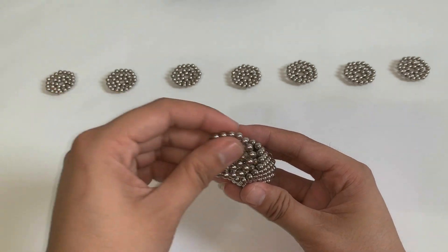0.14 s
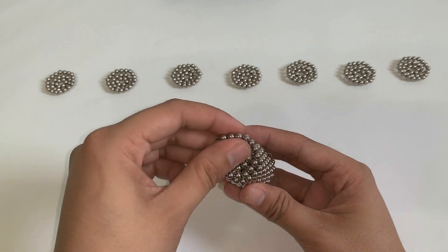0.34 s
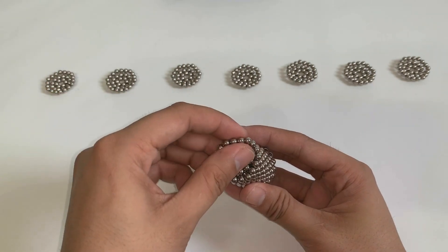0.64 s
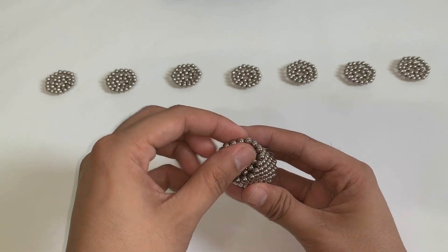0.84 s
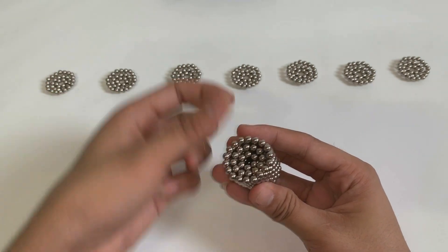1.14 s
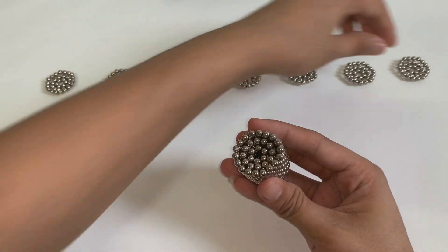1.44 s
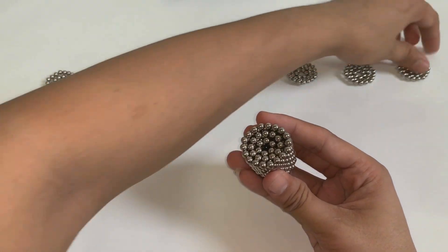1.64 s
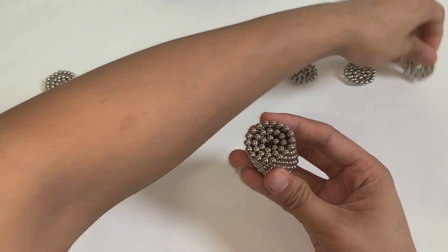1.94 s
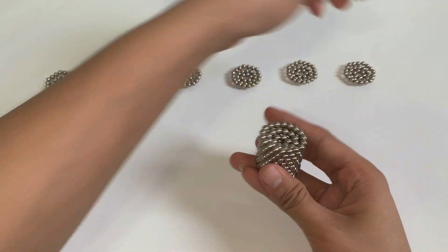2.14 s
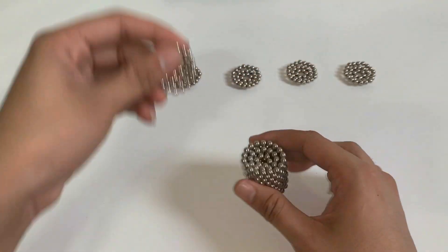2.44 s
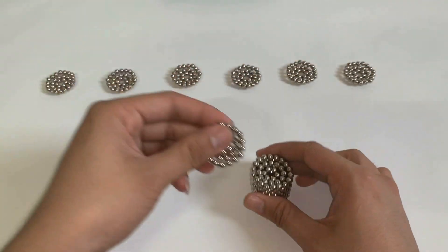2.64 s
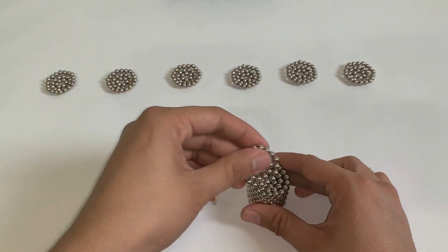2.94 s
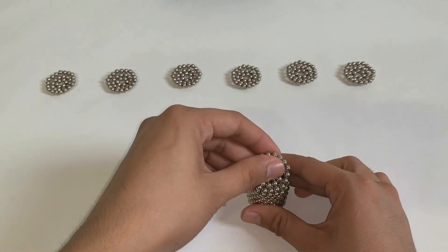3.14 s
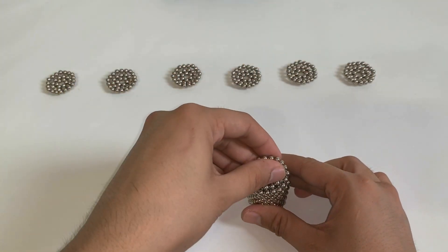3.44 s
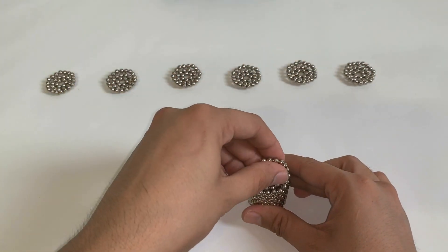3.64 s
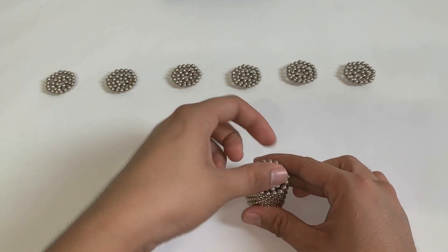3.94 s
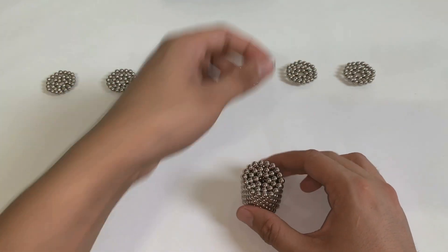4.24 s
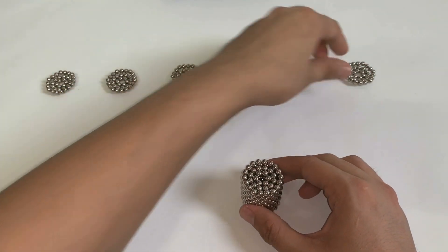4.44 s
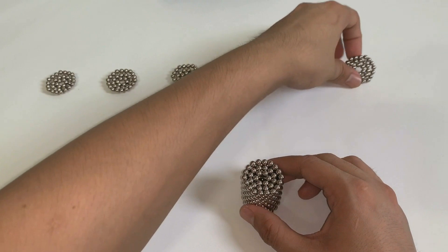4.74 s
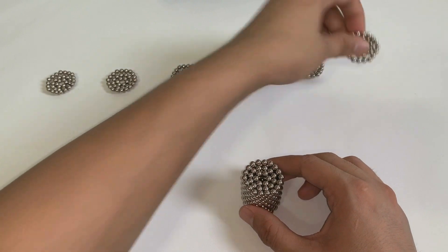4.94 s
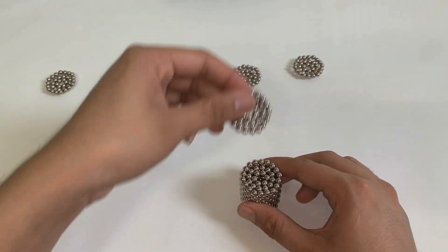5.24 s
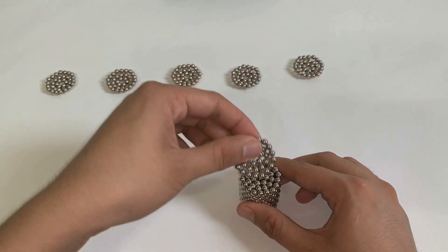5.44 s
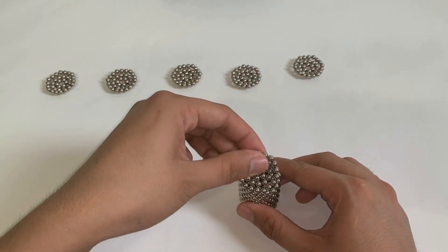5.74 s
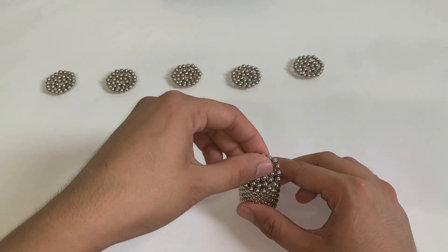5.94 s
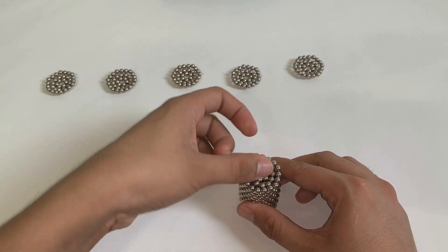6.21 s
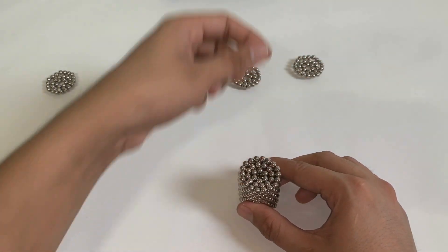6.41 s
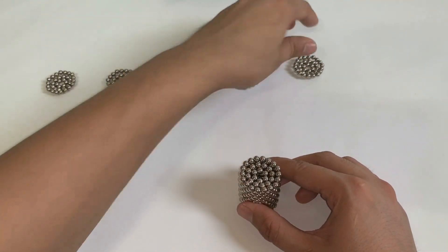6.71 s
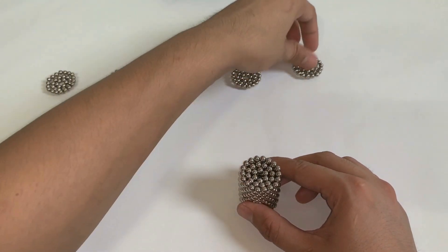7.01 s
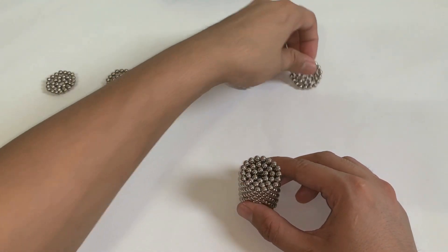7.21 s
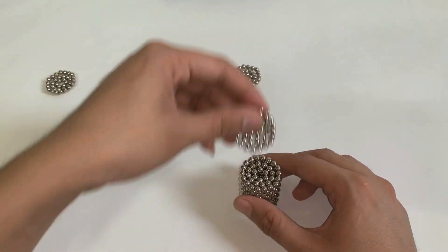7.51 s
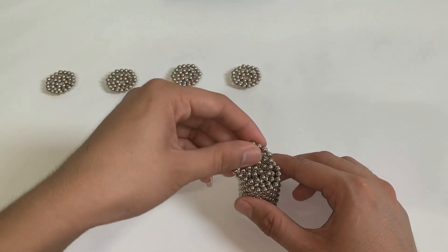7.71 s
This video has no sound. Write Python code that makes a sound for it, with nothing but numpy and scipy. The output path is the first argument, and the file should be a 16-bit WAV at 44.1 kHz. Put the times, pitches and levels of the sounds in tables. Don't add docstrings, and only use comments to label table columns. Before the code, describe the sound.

A close, dry stereo scene in a small quiet room. At about 0.5 s a bright steel click starts scattered ticks, building to tight zipping clusters at 1.0 and 1.1 s as magnetic balls pull together. From 1.5 s soft low bumps lead into short gritty finger scrapes and taps from 1.7 to 2.05 s, with a very faint high squeak near the end. At 2.75 s the stack hits the table: a hard, hollow woody knock with brief ringing. Snaps resume at 3.4 s, small ticks follow, and a very sharp loud burst lands at 3.99 s. Dull bumps, taps and drags fill 4.1 to 4.9 s. More clicks at 5.8 s grow into crackling runs from 6.05 to 6.35 s. Stuttering scrapes follow from 6.9 to 7.3 s, then a modest last snap at 7.8 s. Faint rumble, hum and hiss continue throughout.

```python
import sys
import numpy as np
from scipy import signal
from scipy.fft import rfft, irfft, next_fast_len
from scipy.io import wavfile
from scipy.ndimage import uniform_filter1d, map_coordinates

SR = 44100
rng = np.random.default_rng(int(sys.argv[2]) if len(sys.argv) > 2 else 0)


def wav_record(signal):
    frames = np.transpose(np.atleast_2d(signal))
    bounded = np.clip(frames, -1, 1)
    quanta = np.round(bounded * 32767).astype(np.int16)
    wavfile.write(sys.argv[1], SR, quanta)


def convert_level_to_amplitude(level_db):
    exponent = np.asarray(level_db, float) / 20
    return 10 ** exponent


N = 347067

# time in seconds, level in dB.
KNOCK = (2.7503, -20)
# centre in Hz, width in Hz, level in dB.
PANEL = [(241, 121, -7), (393, 100, 3), (577, 120, -1), (690, 91, -4), (1280, 210, -17)]
# frequency in Hz, left-right likeness from 0 to 1.
ALIKE = [(60, 0.94), (300, .8), (640, 0.47), (1400, 0), (4000, 0)]


def unit(x):
    return x / np.sqrt(np.mean(x ** 2) + 1e-20)


def along(points, hz):
    f, v = np.transpose(points)
    return np.interp(np.log(hz + 1), np.log(f + 1), v)


def curves(rows):
    s, *cols = np.transpose(rows)
    return [np.interp(np.arange(N) / SR, s, c) for c in cols]


def wobble(rate):
    return map_coordinates(rng.standard_normal(int(N * rate / SR) + 4), [np.arange(N) * rate / SR])


def filtered(x, response):
    m = next_fast_len(N + SR // 2)
    return irfft(rfft(x, m) * response(np.fft.rfftfreq(m, 1 / SR)), m)[..., :N]


def modes(table):
    def response(f):
        total = 0
        for k, (centre, width, db) in enumerate(table):
            damping = 1j * f * width
            total = total + (-1) ** k * convert_level_to_amplitude(db) * damping / (centre * centre - f * f + damping)
        return total
    return response


def dull(hz):
    return 1 / (1 + 1j * hz / 2200) ** 2


def add(track, s, sound):
    part = track[round(s * SR):][:len(sound)]
    part += sound[:len(part)]


def swing(db, hz, length, rise):
    u = np.arange(round(5 * length * SR)) / SR / length
    swell = (1 - np.exp(-u / rise)) ** 2 * np.exp(-1.6 * u)
    return convert_level_to_amplitude(db) * swell / swell.max() * np.sin(2 * np.pi * hz * length * u)


def struck(push, table, stretch):
    sound = irfft(rfft(push, 2048) * modes(table)(np.fft.rfftfreq(2048, 1 / SR) * stretch), 2048)
    return sound / np.linalg.norm(sound)


def contacts():
    # time in seconds, peak in dB, stack body in dB re peak.
    held = [(0.4802, -24.5, -21), (.622, -39, -19.5), (0.677, -34, -28), (0.689, -34.5, -17.5),
            (.864, -30, -24), (0.8747, -30, -20.5), (0.908, -30, -16.5), (0.9214, -48, -8),
            (0.989, -26.5, -20), (1.002, -25, -21), (1.0079, -24, -16.5), (1.1084, -22.5, -22),
            (1.1153, -18.5, -27.5), (1.1166, -25, -12.5), (2.049, -48, -22)]
    # time in seconds, peak in dB, stack body and table
    # in dB re peak.
    standing_snaps = [(3.398, -27.5, -16, -29), (3.4008, -23.5, -26.5, -26.5), (3.414, -37, -28, -25),
                      (3.4647, -35.5, -21, -30), (3.5282, -36.5, -26, -40), (3.5888, -39, -9.5, -10.5),
                      (3.6623, -40, -23, -28), (3.7521, -43.5, -6, -16), (3.72, -60, -17, -31),
                      (3.7571, -31.5, -13, -20), (3.918, -34.5, -13, -15), (3.9418, -37.5, -14, -10.5),
                      (3.9648, -37.5, -12.5, -12), (3.9747, -28.5, -22.5, -22.5), (3.983, -23.5, -16, -17),
                      (3.9883, -17.5, -12.5, -36), (3.9914, -12, -16.5, -21.5), (4.19, -58, -11, -18),
                      (5.8109, -21.5, -25.5, -25.5), (5.811, -31.5, -9, -46), (5.917, -44, -14, -25),
                   (5.92, -38.5, -14, -26), (6.0465, -34.5, -18, -40), (6.0538, -31, -19, -27),
                   (6.161, -37.5, -11, -23), (6.1763, -30, -20, -17), (6.2388, -34, -13, -9.5),
                   (6.2591, -37, -2, -5), (6.3182, -27.5, -13, -21), (6.3278, -23, -24, -28),
                   (6.3302, -23.5, -27, -28), (6.343, -25.5, -23, -36), (6.3455, -40.5, 2.5, -0.5),
                   (7.368, -53.5, -18, -29), (7.7853, -28, -20, -30.5), (7.7893, -33, -8.5, -14.5),
                   (6.147, -62, -30, -33)]
    # time in seconds, peak in dB, stack body
    # and table in dB re peak.
    further_snaps = [(.9692, -34, -15, -44.5), (0.9904, -30, -16.5, -45.5), (.9925, -43, -24, -45),
                     (1.004, -31, -15, -45), (1.0105, -45, -27, -45), (1.1005, -46, -16, -44),
                     (1.1105, -22, -23, -44.5), (1.113, -25, -16, -45), (1.1169, -19.5, -21, -31),
                     (1.121, -43, -15, -45), (1.124, -39.5, -18, -45.5), (3.9316, -45, -3, -9),
                     (3.995, -38, 7, -25), (3.999, -40, -7.5, -16.5), (5.8104, -30.5, -16, -23),
                     (3.9897, -12, -13.5, -35), (3.9904, -21.5, -14, -29.5), (6.1837, -35, -11, -25),
                     (6.187, -27.5, -12, -19), (6.1866, -37, -18, -22), (6.188, -40, -18, -28),
                     (6.1958, -31.5, -11, -26), (6.3325, -31.5, -22, -17.5), (6.3345, -24, -20, -27),
                     (0.8679, -49, -15, -45), (0.8784, -43, -18, -45), (.9105, -40.5, -15.5, -45.5),
                     (6.2637, -37, -1, -12), (3.9669, -45, -10, -11)]
    # start in seconds, length in seconds, first and last level in dB.
    zips = [(0.476, 0.0089, -36, -28), (0.9645, 0.002, -43.5, -41.5), (0.984, 0.011, -50, -49),
            (1.008, 0.0029, -48, -31), (1.103, 0.012, -43, -46), (3.926, 0.01, -35, -46.5),
            (3.979, 0.016, -40, -23), (6.158, 0.009, -47, -43), (6.192, .0075, -26, -28),
            (6.206, 0.013, -60, -31), (6.252, 0.0099, -44, -32.5), (6.326, 0.011, -30.5, -29)]
    zip_gap_s, zip_scatter_db, zip_body_db = 0.0026, 1.5, -11.5
    held_pass_db, zip_pass_db = -43.5, -14
    rows = [(*row, held_pass_db) for row in held] + standing_snaps
    for start, length, first_db, last_db in zips:
        gap, size = rng.standard_normal((2, 9))
        after = zip_gap_s * np.cumsum(np.exp(0.31 * gap))
        after = after - after[0]
        db = first_db + (last_db - first_db) * after / length + zip_scatter_db * size
        db[after > length] = -np.inf
        passed_db = held_pass_db if start < KNOCK[0] else zip_pass_db
        rows += [(start + a, d, zip_body_db, passed_db) for a, d in zip(after, db)]
    return rows + further_snaps


def balls():
    # centre in Hz, width in Hz, level in dB.
    steel_modes = [(9790, 2090, 6.5), (12770, 2130, 9.5), (15380, 380, -6.5)]
    # centre in Hz, width in Hz, level in dB.
    cluster_modes = [(2052, 1300, -20.5), (2700, 1100, -8.5), (3980, 1400, -2.5), (5800, 950, -0.5)]
    # centre in Hz, width in Hz, level in dB.
    top_modes = [(252, 120, -4), (500, 120, -1), (935, 340, -6), (1500, 460, -7)]
    rattle_s, rattle_spread = 0.0016, 0.47
    tick, body, down = np.zeros((3, N))
    t = np.arange(900) / SR
    for s, db, body_db, table_db in contacts():
        chance = rng.standard_normal((5, len(t)))
        if np.isinf(db):
            continue
        length = rattle_s * np.exp(rattle_spread * chance[4, 2])
        u = t / max(length - 0.0005, 0.0002)
        impact = (1 - np.exp(-t / 0.0001)) * np.exp(-(1.3 * u) ** 0.94)
        shape = impact + convert_level_to_amplitude(-9.5) * np.exp(-u / 2.6)
        size = convert_level_to_amplitude(db) * np.sqrt(length * SR)
        stretch = np.exp(0.0045 * chance[4, :2])
        rough = shape * chance[0] * convert_level_to_amplitude(1.0 * chance[1])
        add(tick, s, size * convert_level_to_amplitude(-5.5) * struck(rough, steel_modes, stretch[0]))
        add(body, s, size * convert_level_to_amplitude(body_db - 5.5) * struck(shape * chance[2], cluster_modes, stretch[1] ** 3))
        add(down, s, size * convert_level_to_amplitude(table_db - 8.0) * struck(shape * chance[3], top_modes, stretch[1]))
    steep = lambda f: 1j * f / (1j * f + 1500)
    return filtered(tick + body, steep), down


def rings():
    # time in seconds, peak in dB, frequency in Hz.
    ring_rows = [(0.48, -37, 6560), (0.6764, -65, 5050), (0.6895, -56, 6400), (0.8642, -48.5, 6600),
                 (0.8737, -50, 7460), (0.9078, -44, 6670), (0.9694, -49, 6800), (0.9888, -45, 7100),
                 (1.0036, -41, 7600), (1.0039, -37.5, 6540), (1.007, -37, 6600), (1.1076, -33.5, 6240),
                 (1.1154, -33.5, 6270), (3.3984, -46, 4340), (3.4006, -40, 4720), (3.466, -45.5, 6540),
                 (3.5284, -59, 7180), (3.588, -52, 4400), (3.7573, -42.5, 5500), (3.918, -48.5, 4900),
                 (3.9234, -45.5, 4930), (3.9425, -49.5, 4430), (3.9652, -50.5, 4860), (3.9744, -45, 3470),
                 (3.9828, -32, 6400), (3.9891, -19, 5800), (3.992, -19.5, 5470), (5.8107, -39.5, 5600),
                 (5.917, -51, 4800), (6.0454, -56, 5230), (6.054, -50, 2670), (6.1601, -44, 7430),
                 (6.1768, -34.5, 8150), (6.1946, -36.5, 3800), (6.2377, -54, 5090), (6.2575, -42, 2570),
                 (6.318, -55, 5900), (6.328, -41, 7060), (6.3418, -34, 4520), (7.7877, -46.5, 4500),
                 (3.402, -56, 2630), (3.404, -56.5, 1500), (3.5905, -54.5, 1500), (3.592, -55, 2700),
                 (3.759, -58, 2500), (3.7535, -48, 4700), (5.8125, -54.5, 2400), (5.813, -60, 1400),
                 (7.79, -54, 2300), (.481, -52, 3400), (.678, -56, 3540), (1.118, -53, 3600)]
    ring_s, ring_db = 0.0015, -3
    out = np.zeros(N)
    for s, db, hz in ring_rows:
        add(out, s, swing(db + ring_db, hz, ring_s * convert_level_to_amplitude(0.15 * (db + 44.5)), rise=0.11))
    return out


def knock():
    # frequency in Hz, level in dB, 60 dB decay time in seconds.
    board_modes = [(103, -15, 0.53), (222, 0.5, 0.13), (293, -6, 0.078), (380, -1, 0.078),
                   (477, 3.5, 0.064), (509.6, -3, 0.12), (690, -22, 0.22), (738, -18.5, 0.13),
                   (1010, -21, 0.075), (3920, -39.5, .08), (2200, -25, .07), (1376, -29.5, 0.061),
                   (1810, -25, 0.075), (248, 0, 0.052)]
    # centre in Hz, width in Hz, level in dB.
    heel = [(426, 390, 6.5), (1500, 1800, -5.5), (2300, 1200, -17.5), (3930, 590, -18.0)]
    s, size = KNOCK[0], convert_level_to_amplitude(KNOCK[1])
    touch_s = s - 0.002
    t = np.arange(SR) / SR
    ring = sum(convert_level_to_amplitude(db - 60 * t / t60) * np.sin(2 * np.pi * hz * t) for hz, db, t60 in board_modes)
    crack = convert_level_to_amplitude(2.5 - 60 * t / 0.034) * rng.standard_normal(SR)
    jingle = convert_level_to_amplitude(-28.5 - 60 * t / 0.031) * rng.standard_normal(SR)
    out, puff = np.zeros((2, N))
    add(out, s, size * convert_level_to_amplitude(-7) * ring * (1 - np.exp(-(t / 0.0018) ** 2)))
    add(out, touch_s, size * jingle)
    add(puff, touch_s, size * crack * (1 - np.exp(-t / 0.0014)))
    return out + filtered(puff, modes(heel))


def drags():
    # start in seconds, hold in seconds, scrape in dB, grit in dB re scrape, panel in Hz.
    strokes = [(1.701, 0.025, -49, -33, 1090), (1.759, 0.05, -52, -16, 1170),
               (1.821, 0.044, -50, -25, 1090), (1.866, 0.052, -50, -26, 1250),
               (1.928, 0.052, -54, -15.5, 1190), (1.969, 0.011, -46.5, -24, 1110),
               (4.172, 0.043, -68, -13.5, 750), (4.575, 0.089, -52.5, -23.5, 760),
               (4.655, 0.022, -53, -21.5, 880), (4.82, 0.028, -52, -16, 785), (4.867, 0.0042, -66, -8, 850),
               (6.866, 0.023, -62.5, -21.5, 650), (6.982, 0.045, -55, -21, 580),
               (7.093, 0.019, -42.5, -15.5, 770), (7.088, 0.011, -50, -27.5, 690),
               (7.132, 0.068, -51, -18.5, 820), (7.208, 0.022, -47.5, -25.5, 800),
               (7.256, 0.015, -50.5, -11.5, 690)]
    # frequency in Hz, density in dB per Hz.
    grit_spectrum = [(1180, -27), (2000, -6.5), (3840, -6.5), (4260, -3.5), (6820, -17.5), (9250, -20),
                     (11400, -32), (13200, -22), (16000, -46)]
    grip_s, lift_db_per_s = 0.0099, 611
    t = np.arange(SR // 2) / SR
    power = np.zeros(N)
    for s, hold, db, *_ in strokes:
        catch = np.clip(t / grip_s, 0, 1) ** 2
        let_go_db = lift_db_per_s * np.clip(t - grip_s - hold, 0, None)
        add(power, s, (catch * convert_level_to_amplitude(db - let_go_db)) ** 2)
    pressure = np.sqrt(power)
    grit_db, panel_hz = curves([(s + grip_s + hold / 2, *rest) for s, hold, _, *rest in sorted(strokes)])
    grains = rng.standard_normal(N) * convert_level_to_amplitude(2 * wobble(90) + 3 * wobble(500))
    centres = np.array([698, 820, 1095, 1305])
    weights = np.exp(-(np.log(panel_hz / centres[:, None]) / 0.26) ** 2)
    weights /= np.linalg.norm(weights, axis=0) + 1e-9
    bodies = [PANEL] + [[(hz, 90, 0)] for hz in centres]
    still, *lines = filtered(grains, lambda f: np.array([modes(body)(f) * dull(f) for body in bodies]))
    moving = sum(w * unit(line) for w, line in zip(weights, lines))
    scrape = unit(still) + moving * convert_level_to_amplitude(1.0)
    clumps = rng.standard_normal(N) * convert_level_to_amplitude(2 * wobble(60) + 4 * wobble(900))
    grit = filtered(clumps, lambda hz: convert_level_to_amplitude(along(grit_spectrum, hz)))
    return pressure * (unit(scrape) + convert_level_to_amplitude(grit_db) * unit(grit))


def catches():
    # time in seconds, peak in dB,
    # frequency in Hz, length in seconds.
    catch_rows = [(1.733, -43, 1300, 0.00094), (2.048, -53.5, 8370, 0.0021), (1.7642, -52, 2592, .0015),
                  (1.791, -41, 2200, 0.0013), (1.796, -51, 4120, 0.002), (1.801, -43.5, 2510, 0.0023),
                  (1.8914, -49, 1900, 0.0013), (1.989, -49.5, 2500, 0.0018), (1.999, -48, 1160, 0.0042),
                  (1.872, -54, 1280, 0.0052), (4.5925, -57.5, 3200, 0.0016), (4.594, -48.5, 1430, 0.0044),
                  (4.668, -60.5, 1890, 0.005), (4.821, -50.5, 3920, .002), (4.877, -40.5, 3920, 0.0018),
                  (4.879, -39.5, 1270, 0.0035), (7.112, -54.5, 3300, 0.0022), (7.118, -51, 3460, 0.0034),
                  (7.113, -53.5, 2200, .002), (7.15, -62, 3100, .002), (7.2202, -48, 1500, 0.0019),
                  (7.221, -56.5, 3100, 0.0044), (7.266, -59, 2200, .0015), (7.267, -55, 3400, .0015),
                  (7.279, -57, 3520, .002), (7.289, -61, 3180, 0.0017), (1.885, -40, 1240, 0.0057),
                  (1.906, -49, 1220, 0.0067), (1.931, -51, 1280, .004), (1.745, -54, 2200, 0.0024),
                  (1.84, -55, 2400, .002), (4.623, -54, 1206, .002), (4.645, -54, 1400, .002),
                  (4.688, -44, 1090, .002)]
    out = np.zeros(N)
    for s, db, hz, length in catch_rows:
        add(out, s, swing(db, hz, length, rise=0.13))
    return out


def taps():
    # time in seconds, peak in dB, frequency in Hz, length in seconds, snap in dB re peak.
    tap_rows = [(1.712, -44, 460, 0.0047, -7), (1.7343, -30, 1920, 0.00075, -6),
                (1.791, -45, 1360, 0.0019, 8.5), (1.7957, -43, 1203, 0.0087, 13.5),
                (1.988, -56, 1130, 0.0025, -5), (4.106, -54, 448.4, 0.004, -10),
                (4.573, -44, 401, 0.0049, -4), (4.592, -36, 736, 0.0027, -4), (4.669, -36, 809, 0.009, -10),
                (4.8206, -32, 698, 0.0019, 4.5), (4.876, -33.5, 817, 0.0033, 6),
                (6.343, -43, 521, 0.0086, 8), (6.882, -43, 454, 0.0027, -15.5),
                (6.976, -50, 500.0, 0.0033, -10)]
    out, snaps, rumble = np.zeros((3, N))
    t = np.arange(6000) / SR
    for s, db, hz, length, snap_db in tap_rows:
        add(out, s, swing(db, hz, length, rise=0.12))
        snap = convert_level_to_amplitude(db + snap_db - 60 * t / 0.021) * (1 - np.exp(-t / 0.0019))
        add(snaps, s, snap * rng.standard_normal(len(t)))
        add(rumble, s, convert_level_to_amplitude(db + snap_db - 5.0 - 60 * t / 0.095) * rng.standard_normal(len(t)))
    board = modes(PANEL + [(933, 190, 0.021)])
    edge = modes([(1920, 890, 3.5), (4320, 590, -14.0), (5800, 7600, -20.0)])
    snaps = filtered(snaps, lambda f: edge(f) / (1 + 1j * f / 6000))
    return out + snaps + filtered(rumble, lambda f: board(f) * dull(f))


def squeak():
    # time in seconds, level in dB.
    whistle_db = [
        (1.9, -79),
        (1.96, -70),
        (2.02, -75.5),
        (2.08, -99),
    ]
    before, after = (whistle_db[0][0] - 0.01, -130), (whistle_db[-1][0] + 0.01, -130)
    level_db, = curves([before, *whistle_db, after])
    band = signal.butter(2, [4350, 4950], "band", fs=SR, output="sos")
    whistle = signal.sosfilt(band, rng.standard_normal(N))
    return convert_level_to_amplitude(level_db + 3 * wobble(80)) * unit(whistle)


def bumps():
    # time in seconds, peak in dB, frequency in Hz.
    thumps = [(1.498, -52, 52), (1.551, -42, 50.48), (1.6364, -43.5, 94.4), (1.6623, -45, 43.5),
              (1.714, -38.5, 59), (1.988, -44.5, 52), (2.277, -49, 48.3), (2.283, -42, 150),
              (3.403, -48, 231), (3.447, -48.5, 65), (3.5906, -53, 222), (3.9322, -52, 134),
              (3.988, -36, 222), (4.015, -43.5, 112.6), (4.0912, -45, 110), (4.1358, -55.5, 106),
              (4.198, -40, 124.6), (4.27, -55, 124), (4.577, -46.5, 249), (4.63, -51.5, 108.5),
              (4.739, -45, 50.4), (5.8149, -49.5, 111), (6.081, -53, 104.4), (6.1815, -45, 124.3),
              (6.263, -50.5, 125.6), (6.327, -46.5, 111.5), (6.88, -51.5, 232), (6.903, -44.5, 49.1),
              (1.797, -52, 135), (7.794, -45, 126.4)]
    # frequency in Hz, length in seconds.
    swing_s = [(50, 0.016), (90, 0.009), (120, 0.041), (150, 0.011), (230, 0.014)]
    out = np.zeros(N)
    for s, db, hz in thumps:
        add(out, s, swing(db, hz, along(swing_s, hz), rise=0.11))
    return out


def ports(x, offsets):
    hz, phase, db = np.transpose(offsets)

    def response(f):
        half = convert_level_to_amplitude(np.interp(f, hz, db) / 2)
        smooth = uniform_filter1d(np.interp(f, hz, phase), size=len(f) // 40, mode="nearest")
        return np.array([half * np.exp(1j * smooth), 1 / half])
    return filtered(x, response)


def room(x):
    # frequency in Hz, 60 dB decay time in seconds.
    decay_s = [(200, 0.32), (700, 0.24), (1400, 0.25), (3700, 0.2), (6000, .25), (10000, 0.22),
               (13500, 0.31), (16000, 0.16)]
    fade_bend = 0.97
    out, hop = np.zeros((2, N + SR)), SR // 2
    for start in range(0, N, hop):
        hz, t, z = signal.stft(rng.standard_normal((2, SR // 2)), SR, nperseg=256)
        fade = convert_level_to_amplitude(-60 * (t / along(decay_s, hz)[:, None]) ** fade_bend)
        tail = signal.istft(z * fade, SR, nperseg=256)[1]
        wet = signal.fftconvolve(x[None, start:start + hop], tail / np.linalg.norm(tail[0]), axes=1)
        out[:, start + 130:start + 130 + wet.shape[1]] += wet

    def share(hz):
        alike = np.clip(along(ALIKE, hz), 0, 1)
        return np.sqrt((1 - alike) / (1 + alike))
    mid = (out[0, :N] + out[1, :N]) / np.sqrt(2)
    side = filtered(out[0, :N] - out[1, :N], share) / np.sqrt(2)
    return np.array([mid + side, mid - side]) / np.sqrt(2)


def rush(spectrum):
    def response(hz):
        turn = np.arccos(np.clip(along(ALIKE, hz), -1, 1)) / 2
        return convert_level_to_amplitude(along(spectrum, hz)) * [np.cos(turn), np.sin(turn)]
    mid, side = filtered(rng.standard_normal((2, N)), response)
    return unit(np.array([mid + side, mid - side]))


def patchy(x, depth_db):
    # centre in seconds, half length in seconds, depth in dB.
    clamps = [(0.335, 0.12, 1.5), (1.348, 0.06, 5), (1.235, 0.027, 5), (2.495, 0.11, 1), (3.292, 0.11, 2.5),
              (4.451, 0.074, 0.5), (5.198, 0.13, 1), (5.866, 0.045, 8), (5.996, .04, 3), (6.617, 0.14, 3),
              (7.553, 0.17, 1.5)]
    clamp_hz, clamp_octaves = 2500, 0.94
    z = signal.stft(x, nperseg=512)[2]
    field = uniform_filter1d(rng.standard_normal(z.shape[1:]), size=2, axis=0)
    field = unit(uniform_filter1d(field, size=19, axis=1))
    hz = np.fft.rfftfreq(512, 1 / SR)[:, None]
    t = np.arange(z.shape[2]) * 256 / SR
    band = np.exp(-(np.log2((hz + 1) / clamp_hz) / clamp_octaves) ** 4)
    wide = np.exp(-(np.log2((hz + 1) / 2800) / 1.1) ** 4)
    clamp_db = band * sum(db * np.exp(-((t - s) / half) ** 4) for s, half, db in clamps)
    dropout = np.clip(3 * (field - 1.6 + 0.5 * wide + 0.2 * clamp_db), 0, 1)
    return signal.istft(z * convert_level_to_amplitude(-clamp_db - depth_db * dropout), nperseg=512)[1][:, :N]


def floor():
    # frequency in Hz, density in dB per Hz.
    low_spectrum = [(12, -45), (20, -17), (54, 1.5), (86, -8), (110, -8.5), (140, -34), (240, -120)]
    hum_spectrum = [(47, -44), (80, -15.5), (124, -2.5), (184, -16), (232, -8), (400, -18), (439, -20),
                    (900, -37.5), (1170, -75), (1980, -120)]
    hiss_spectrum = [(290, -33), (500, -9), (585, -18), (745, -12.5), (1020, -13), (1320, -13.5),
                     (2230, -17.5), (4600, -15.5), (7160, -21), (10100, -21), (11300, -23.5), (13600, -18),
                     (15000, -25.5)]
    # time in seconds, level in dB.
    lean = [(0, -70.5), (1.95, -67), (2.65, -77), (2.94, -65.5), (3.8, -67), (4.12, -60.5), (4.4, -69),
            (4.8, -63.5), (5.15, -72), (6.16, -64.5), (6.88, -69.5), (7.1, -63.5), (7.36, -72), (7.87, -68)]
    lean_db, = curves(lean)
    lean_db = lean_db - lean_db.mean()
    sway_db = -68.5 + 0.89 * lean_db
    hum_db = -70.5 + 1.3 * lean_db
    sway = convert_level_to_amplitude(sway_db + 2.5 * wobble(12)) * rush(low_spectrum)
    hum = convert_level_to_amplitude(hum_db + 1.8 * wobble(7.5)) * rush(hum_spectrum)
    hiss = filtered(rush(hiss_spectrum), lambda hz: hz < 15200)
    return sway + hum + convert_level_to_amplitude(-81.5 + 0.56 * wobble(7.2)) * patchy(hiss, depth_db=14.5)


def scene():
    # frequency in Hz, phase in radians, level in dB.
    hand_offsets = [(0, 0, 0), (1460, -.5, 1.5), (2760, 1.4, 2.5), (5600, 2.1, -4.5), (7500, .9, .5),
                    (16800, -8.9, -.7)]
    table_offsets = [(0, 0.5, 1.5), (150, 0.65, -1), (297.9, 0.5, 0), (988.6, 0.8, 2), (2310, 1, 4.5),
                     (6200, 1, -4.5), (12000, -0.42, -1)]
    # frequency in Hz, level in dB.
    wall_colour = [(2000, 3.5), (4500, 2), (5800, 4), (7500, 5), (10000, -3.5), (12500, -7), (14500, 0),
                   (16000, -2)]
    direct_share = 0.58
    background, soft = floor(), bumps()
    table = taps() + drags() + knock() + squeak()
    steel, passed_down = balls()
    ring = rings()
    table = table + passed_down + catches()
    near = ports(steel + ring, hand_offsets) + ports(table, table_offsets) + soft
    to_walls = convert_level_to_amplitude(-13.0) * filtered(steel, lambda hz: convert_level_to_amplitude(along(wall_colour, hz)))
    wet = room(to_walls + convert_level_to_amplitude(-21) * ring + convert_level_to_amplitude(-4.5) * table + convert_level_to_amplitude(-9.0) * soft)
    notch = lambda f: 1 - 1.0 * 1j * f * 800 / (11450 ** 2 - f * f + 1j * f * 800)
    return direct_share * near + filtered((1 - direct_share) * near + wet + background, notch)


def band_limit(x):
    return signal.sosfilt(signal.butter(12, 16800, fs=SR, output="sos"), x)


def record(dry):
    limited = filtered(dry, lambda hz: np.clip((16950 - hz) / 1500, 0, 1) ** 1.5)
    return band_limit(limited)


dry = scene()
out = record(dry)
wav_record(out)
```